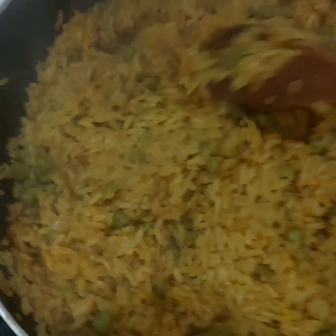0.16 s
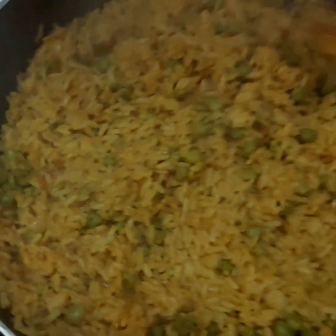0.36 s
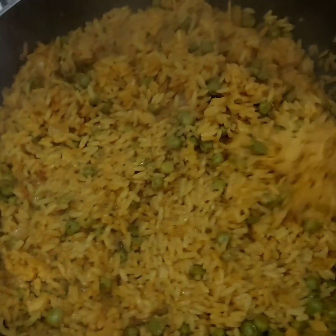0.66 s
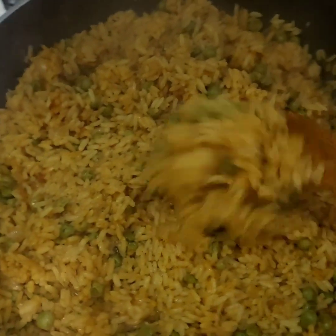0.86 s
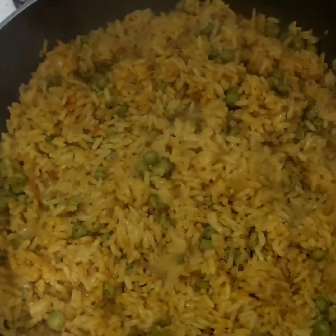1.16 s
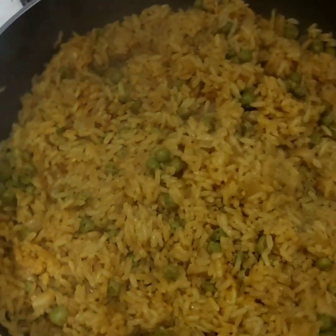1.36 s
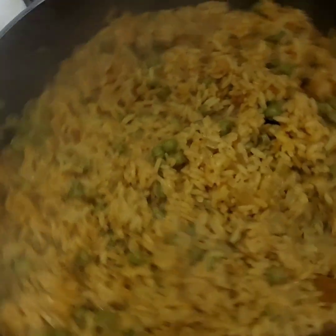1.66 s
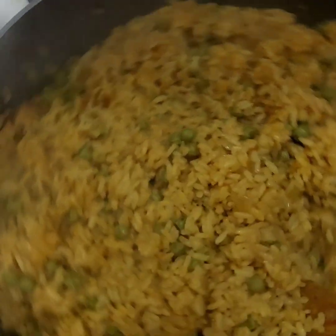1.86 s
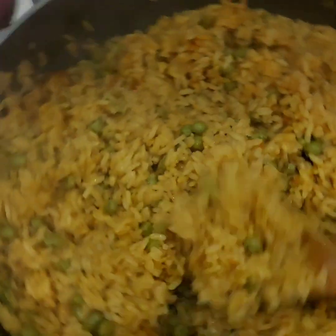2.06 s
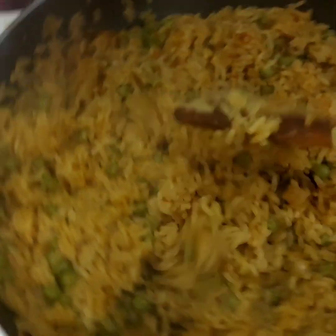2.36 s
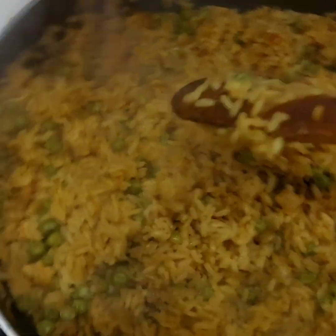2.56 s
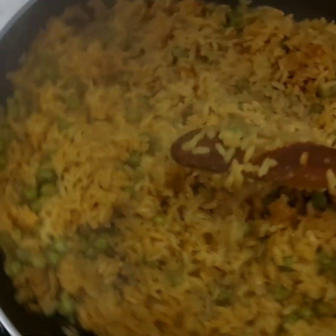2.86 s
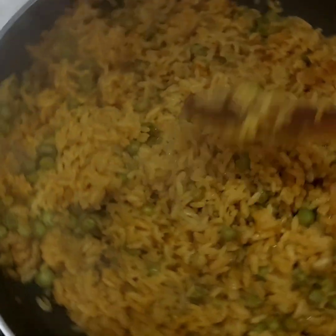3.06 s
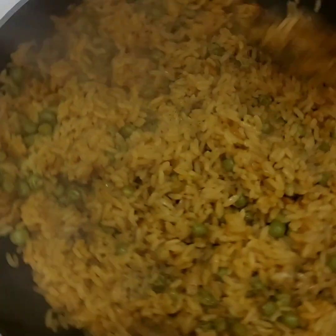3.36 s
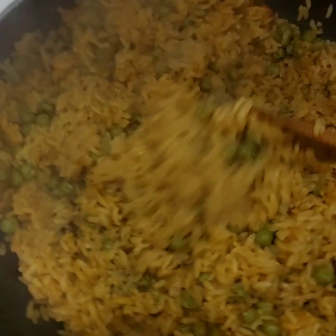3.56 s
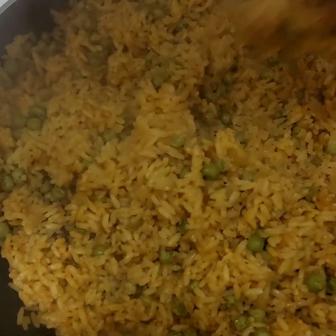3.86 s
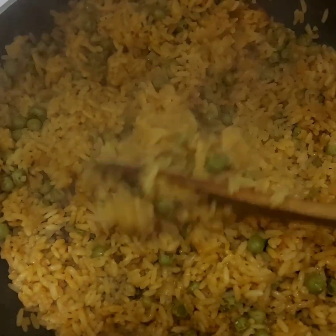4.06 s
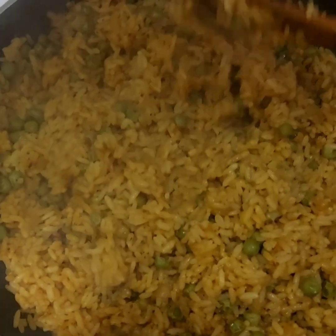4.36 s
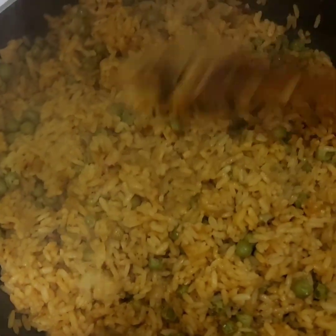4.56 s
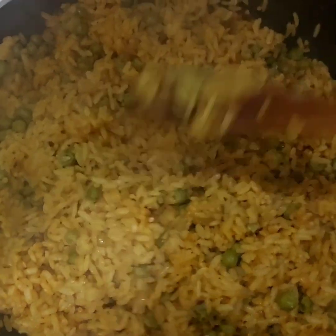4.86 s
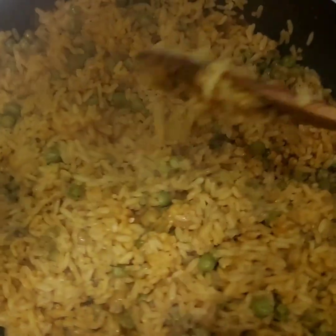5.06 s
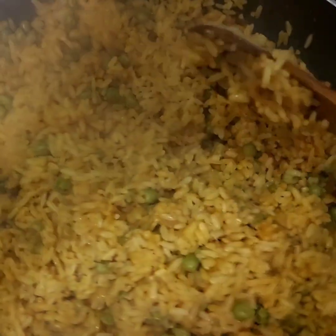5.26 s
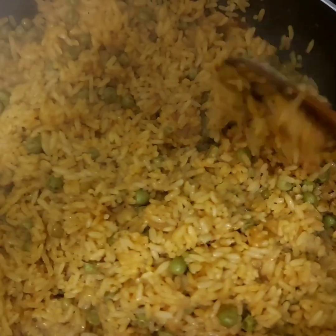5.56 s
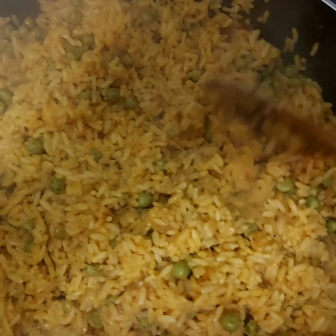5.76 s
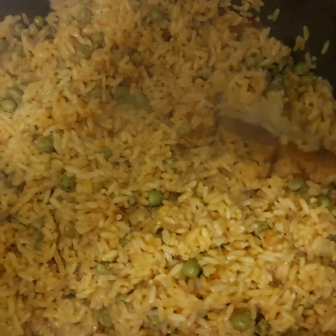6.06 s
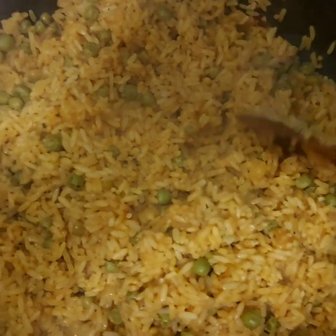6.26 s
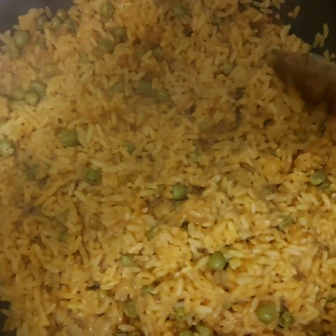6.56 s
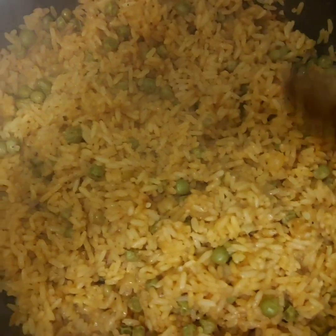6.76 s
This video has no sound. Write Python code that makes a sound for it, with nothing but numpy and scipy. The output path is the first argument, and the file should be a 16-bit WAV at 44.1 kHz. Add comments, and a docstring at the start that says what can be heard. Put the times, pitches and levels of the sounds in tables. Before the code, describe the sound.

A wooden spatula digs and scrapes through cooked rice in a pan with soft bumps, then raps the rim nine times, loud and steady.

```python
"""Turning rice in a pan

A wooden spatula digs through cooked rice, bumps the pan and drags over its bottom, then raps the rim nine times.
Knocks are damped modes of wood and pan plus a noise crack; drags, sweeps and rubs are trains of tiny slips.
Lumps of rice thud back into the pan, and the small kitchen answers with dense echoes.
Behind it, filtered noise and random bursts make a faint sizzle, frying, steam and a low stove murmur."""
import sys
import numpy as np
from scipy import signal
from scipy.fft import rfft, irfft, next_fast_len
from scipy.io import wavfile

SR = 44100
rng = np.random.default_rng(int(sys.argv[2]) if len(sys.argv) > 2 else 0)


def to_wav(s):
    """Save 16-bit WAV."""
    ch = np.atleast_2d(s).T  # columns
    pcm = np.round(np.clip(ch, -1, 1) * 32767)  # PCM
    wavfile.write(sys.argv[1], SR, pcm.astype(np.int16))


N = 304731
RING = 32768  # length of one event and its ring [samples]
RICE_T60_S = 0.65  # rice lying on the bottom damps every mode to under this time
BOTTOM_WEIGHT_HZ = 334  # on the bottom, the weight of the arm tells below this pitch

# spatula raps on the rim: (time [s], pitch favoured by the contact point [Hz], its lift [dB],
# level before layer gain [dB], weight behind it [dB], cut-off of the contact [Hz])
RAPS = [(5.4474, 2050, 15, -23, -7, 5700), (5.622, 1820, 10.5, -23, -1, 5230),
        (5.8002, 1850, 7.5, -22.5, -1.5, 4630), (5.972, 1500, -4.5, -22, -1.5, 3000),
        (6.1349, 1130, 5, -25, 4, 4770), (6.3232, 1450, 0, -21, -3.5, 5230),
        (6.5041, 1490, 0, -23.5, 0.5, 3650), (6.6732, 1500, 4.5, -21.5, -1, 6470),
        (6.8475, 1450, 2, -20, -4.5, 6400)]
# strokes of the blade over the bottom: (start [s], length [s], level before layer gain [dB],
# pitch favoured by the contact point [Hz])
STROKES = [(0.375, 0.028, -49.5, 1200), (0.94, 0.058, -42, 2240), (1.74, 0.028, -35, 1290),
           (1.861, 0.2, -52, 1960), (2.146, 0.014, -38, 1130), (2.501, 0.023, -45.5, 1080),
           (2.769, 0.025, -50, 1500), (2.85, 0.0077, -54, 1610), (3.144, 0.014, -45, 2300),
           (3.303, 0.03, -50.5, 1700), (3.544, 0.041, -50, 950)]
# the pan on its support: (pitch [Hz], bare t60 [s], level struck on the rim [dB],
# level struck on the bottom [dB])
PAN = [(79.15, 1, -25, -24.5), (114.5, 0.13, -15.5, -48), (137, 0.38, -61, -19), (190.7, 0.28, -27, -40),
       (236.3, 0.37, -36, -27.5), (287.4, 0.38, -31.5, -29), (315.2, 0.53, -56, -20.5),
       (328, 0.3, -25.5, -22.5), (380, 0.4, -64, -27), (401, 0.56, -43.5, -30.5), (439.6, 0.22, -30, -24.5),
       (461, 0.025, -50, -19), (510.5, 0.45, -34.5, -32.5), (610.7, 0.092, -17, -19.5),
       (763, 0.27, -38, -34), (1042, 0.31, -42, -39.5), (1246, 0.19, -50, -82), (1394, 0.11, -32, -67),
       (1796, 0.24, -55, -72), (1791, 0.4, -44, -50), (1980, 0.18, -37, -38), (2076, 0.17, -56, -75),
       (2470, 0.75, -43, -54), (2946, 0.16, -34.5, -46)]
# thud, body, knock, click and tick: (lower edge [Hz], upper edge [Hz])
BANDS = [(60, 160), (200, 700), (900, 2600), (3000, 8000), (9000, 15000)]
# balance of a bare, hard contact on the bottom or wall: (one level per band of BANDS [dB])
DIG_BALANCE = [-4, -1.5, 0, -4, -22.5]
# colour of a pop: (frequency [Hz], relative level [dB])
POP = [(1000, 0), (4000, -14), (8000, -13), (12000, -11), (16000, -11)]
# colour of the sizzle: (frequency [Hz], relative level [dB])
SIZZLE = [(300, -11), (1000, -1), (1700, 4.5), (2300, 3), (3000, -2), (5000, -4.5), (8000, -1),
          (9600, -2.5), (11500, 0.5), (14000, 0), (16000, -14)]


def digs(echoes, gain_db=0.0, lift_db=6):
    """The blade is pushed through the rice until it meets the pan."""
    # the more rice lies between blade and pan, the lower the cut-off:
    # (time [s], pitch favoured by the contact point [Hz], level before layer gain [dB],
    # weight behind it [dB], cut-off of the contact [Hz])
    bumps = [(0.2944, 596, -42, -11.5, 650), (0.5441, 580, -49, -7, 590), (1.0198, 970, -45, 1, 3720),
             (1.7382, 3800, -41, -0.5, 5700), (1.811, 1190, -59.5, 13.5, 2000),
             (1.874, 950, -36.5, -24, 2800), (1.956, 1830, -41, -5.5, 1920), (2.1477, 1080, -41, 6.5, 3700),
             (2.5044, 1090, -47.5, 2, 2300), (2.548, 1120, -56.5, 11, 2210), (3.137, 2300, -50, -25, 2150),
             (3.307, 1400, -58, -11, 3400), (3.352, 1610, -60, -10, 3400), (3.543, 1120, -59.5, 15, 2200),
             (3.6904, 1140, -65.5, 9, 1800), (3.746, 1120, -71, 19, 2380)]
    out = np.zeros((2, N))
    for s, hz, db, weight_db, cutoff_hz in bumps:
        hit = favour(bottom_blow(echoes), hz, lift_db)
        add(out, s, force(hit, contact(DIG_BALANCE, db, weight_db, BOTTOM_WEIGHT_HZ, cutoff_hz)))
    return undb(gain_db) * out


def raps(echoes, gain_db=-0.1):
    """The shaft is knocked on the bare rim, each time at another point along its length."""
    # hand-damped bending modes, struck across the shaft: (pitch [Hz], t60 [s], level [dB])
    shaft = [(317, 0.025, -3), (626, 0.038, -4), (1160, 0.013, -15.5), (1633, 0.0079, -3.5),
             (1980, 0.034, -21.5)]
    # how the rim radiates: (frequency [Hz], level [dB])
    rim = [(80, -4.5), (125, 4), (165, -4), (200, -6), (275, 1.5), (320, -1), (490, 2.5), (550, -5.5),
           (640, -2.5), (730, -2.5), (850, -4.5), (950, -3), (1060, 1.5), (1230, 9.5), (1320, 2), (1410, 4),
           (2050, -1), (2350, -2.5), (2500, -6.5), (2950, -4.5)]
    # balance of a bare, hard rap: (one level per band of BANDS [dB])
    rap_balance = [-7, -0.05, 0, -14.5, -17.5]
    weight_hz = 650  # on the rim, the weight of the arm tells below this pitch
    bare_pan = [(hz, t60, rim_db) for hz, t60, rim_db, _ in PAN]
    out = np.zeros((2, N))
    for s, hz, lift_db, db, weight_db, cutoff_hz in RAPS:
        hit = blow(shaft, bare_pan, echoes, crack_db=-18.5, crack_s=0.0033, pan_db=1.5, room_db=-23.5,
                   left_db=2.0, lag_s=0.00014, wood_cycles=0.27, pan_cycles=1.0, detune=0.019,
                   uneven_db=4.0, moved=0.14)
        hit = favour(colour(hit, rim), hz, lift_db)
        add(out, s, force(hit, contact(rap_balance, db, weight_db, weight_hz, cutoff_hz)))
    return undb(gain_db) * out


def ticks(echoes, gain_db=-3.0):
    """The thin edge of the blade glances off the wall while stirring, and catches it between raps."""
    # clicks: (time [s], level before layer gain [dB], weight behind it [dB], cut-off of the contact [Hz])
    clicks = [(0.3721, -40.5, 0.5, 2300), (0.937, -40, -9, 5030), (2.774, -51.5, -4, 3200),
              (2.793, -53, -6, 3500), (2.85, -58, -6, 3800), (3.184, -52, -20, 3700),
              (3.1983, -49.5, -20, 3700), (3.6386, -64, -5, 4580), (5.583, -49.5, 13, 2200),
              (5.7276, -35, -10, 3980), (5.93, -53, -13, 3350), (6.4405, -30, -13, 6700),
              (6.482, -41, 3, 2800), (6.636, -45, -21, 2010), (6.7814, -31.5, -14, 6550)]
    # resonances that the edge brings out, brightest near 3.5 kHz: (frequency [Hz], level [dB])
    edge = [(300, 0), (620, -9), (1080, 6), (1400, 3), (1750, -7), (2300, -1), (2800, -1), (3500, 7),
            (4200, 0), (5000, -6), (6000, 1), (9000, -3)]
    out = np.zeros((2, N))
    for s, db, weight_db, cutoff_hz in clicks:
        hit = colour(bottom_blow(echoes), edge)
        add(out, s, force(hit, contact(DIG_BALANCE, db, weight_db, BOTTOM_WEIGHT_HZ, cutoff_hz)))
    return undb(gain_db) * out


def bottom_blow(echoes):
    """The blade tip strikes the rice-covered bottom, which radiates through the rice."""
    # the spatula's wood, struck on the tip of the blade: (pitch [Hz], t60 [s], level [dB])
    blade = [(577, 0.061, -50), (1200, 0.015, -4.5), (1500, 0.051, -19.5), (2300, 0.035, -13),
             (3190, 0.0061, -8.5), (3700, 0.013, -13), (6320, 0.015, -25.5), (7200, 0.012, -23)]
    # how the bottom radiates through the rice: (frequency [Hz], level [dB])
    bottom = [(140, -1), (185, -3), (240, 5.5), (400, -3), (500, -7.5), (700, -5), (1100, 1), (1900, 0),
              (2700, -3), (3400, 0.5), (5100, -1), (7800, -0.5), (9400, -10), (12000, -16)]
    hit = blow(blade, covered_pan(RICE_T60_S), echoes, crack_db=-13.5, crack_s=0.0025, pan_db=7.0,
               room_db=-16.5, left_db=0.0, lag_s=0.00002, wood_cycles=1.0, pan_cycles=4.1, detune=0.056,
               uneven_db=4.0)
    return colour(hit, bottom)


def blow(wood, pan, echoes, crack_db, crack_s, pan_db, room_db, left_db, lag_s,
         wood_cycles, pan_cycles, detune, uneven_db, moved=0.093):
    """One contact: the wood clacks, its surface cracks, the pan takes up the ring and the kitchen answers."""
    t = np.arange(RING) / SR
    clack = -ring(wood, detune, wood_cycles)
    # the right port hears it first
    late_clack = np.interp(t - lag_s, t, clack, left=0)
    clack = np.array([undb(left_db) * late_clack, clack])

    crack_colour = [(500, 22.5), (3000, 11.0), (7500, -3.0), (9600, -9.0), (11500, -12.5), (16000, -21.5)]
    crack = colour(diffuse(RING), crack_colour) * np.exp(-t / crack_s)

    # each contact point favours other modes of the pan
    uneven_pan = [(hz, t60, db + uneven_db * rng.standard_normal()) for hz, t60, db in pan]
    metal = ring(uneven_pan, 0.0044, pan_cycles)

    moved = np.clip(moved, 0, 1)  # share of the echo pattern that changes with the contact point
    room = kitchen(np.sqrt(1 - moved) * echoes + np.sqrt(moved) * diffuse(RING))
    return clack + undb(crack_db) * crack + undb(pan_db) * metal + undb(room_db) * room


def ring(modes, detune, swell_cycles):
    """Damped sines, slightly retuned by each contact point; low modes take longest to build up."""
    t = np.arange(RING, dtype=np.float32) / SR
    hz, t60, db = np.transpose(modes).astype(np.float32)[:, :, None]
    hz = hz * (1 + detune * rng.standard_normal(hz.shape)).astype(np.float32)
    build = 1 - np.exp(-np.minimum(t * hz / float(swell_cycles), 20))
    fade = np.exp(-np.minimum(float(np.log(1000)) * t / t60, 20))
    return undb(db[:, 0]) @ (build * fade * np.sin(2 * np.pi * hz * t))


def covered_pan(longest_s):
    """Modes of the pan struck on the bottom, damped by the rice on it."""
    return [(hz, 1 / (1 / t60 + 1 / longest_s), db) for hz, t60, _, db in PAN]


def contact(balance, db, weight_db, weight_hz, cutoff_hz):
    """Starting level of each band: weight adds bass, a cushioned contact loses treble."""
    hz = np.sqrt(np.prod(BANDS, axis=1))
    cushion = -10 * np.log10(1 + (hz / cutoff_hz) ** 4)
    weight = weight_db / (1 + (hz / weight_hz) ** 2)
    # the cushion leaves the knock, band 2, as it is
    return db + np.array(balance) + weight + cushion - cushion[2]


def force(x, levels_db):
    """Strength and hardness of a contact set how loud each band starts."""
    size = SR // 20  # the first 50 ms
    window = signal.get_window("hann", 2 * size)[size:] ** 0.25
    hz = freqs(RING)
    for _ in range(2):  # a second pass comes closer to the wanted levels
        energy = np.abs(rfft(x[:, :size] * window, RING)) ** 2
        power = np.mean(energy, axis=0) * 2 / (size * RING)
        now = [10 * np.log10(power[(hz > lo) & (hz < hi)].sum()) for lo, hi in BANDS]
        x = colour(x, [(np.sqrt(lo * hi), want - has)
                       for (lo, hi), want, has in zip(BANDS, levels_db, now)])
    return x


def favour(x, hz, lift_db, width=1.44):
    """The point of contact brings out the modes around one pitch."""
    return colour(x, [(hz / width, 0), (hz, lift_db), (hz * width, 0)])


def drag(echoes, gain_db=1.0, shifts_per_s=22, count=5):
    """The blade sticks and slips over grains: each slip is a tiny blow at a contact point that keeps shifting."""
    # colour of a slip of the blade: (frequency [Hz], level [dB])
    slip_colour = [(80, -2.5), (300, -3.5), (800, 0.5), (1200, -7), (3000, -6), (5000, -5), (7500, -4),
                   (11000, 15)]
    t = np.arange(N) / SR
    pushes = undb(gain_db) * rubbing()
    place = rng.integers(count, size=N)[(t * shifts_per_s).astype(int)]
    out = 0
    for k in range(count):
        body = colour(bottom_blow(echoes), slip_colour)
        body = body / np.sqrt(np.mean(body ** 2) * RING)  # unit energy
        out = out + signal.oaconvolve(pushes * (place == k), body, axes=1)[:, :N]
    return out


def rubbing(lift_db=5):
    """Grains rub on the pan: pushed by each stroke, crumbling after it, jolted by each rap."""
    release_s = 0.03  # time constant of lifting off
    crumble_db, crumble_s = -21, 0.24  # loosened rice trickles on: level against the stroke, time constant
    rattle_db, jolt_s, rattle_s = -28.5, 0.022, 0.13  # level against the rap, jolt length, time constant
    out = np.zeros((1, N))
    for s, length_s, db, hz in STROKES:
        pressure = swell(length_s, release_s) + undb(crumble_db) * swell(length_s, crumble_s)
        add(out, s, favour(undb(db) * pressure * slips(), hz, lift_db)[None])
    for s, _, _, db, _, _ in RAPS:
        add(out, s, (undb(db + rattle_db) * swell(jolt_s, rattle_s) * slips())[None])
    return out


def swell(length_s, release_s, rise=0.1):
    """Pressure of one push: it builds over the share rise of its length, holds and dies away."""
    t = np.arange(RING) / SR
    return np.clip(t / (rise * length_s), 0, 1) * np.exp(-np.clip((t - length_s) / release_s, 0, 20))


def slips(slips_per_s=560, spread_db=5, clump_db=4.0, clumps_per_s=55):
    """Stick and slip: tiny pushes of uneven size at random moments, bunched by clumps of rice."""
    sizes = undb(spread_db * rng.uniform(-2.1, 2.0, RING)) * rng.choice([-1, 1], RING)
    knots = rng.uniform(-2.3, 2.4, RING)
    clumps = np.interp(np.arange(RING) / SR * clumps_per_s, np.arange(RING), knots)
    moments = rng.random(RING) < slips_per_s / SR
    return level(moments * sizes * undb(clump_db * clumps), 0)


def sweeps(echoes, pan_db=-8):
    """The flat blade in loose rice: dense light slips swish with its speed, and the pan sings faintly."""
    # sweeps: (time of the fastest moment [s], half length [s], level [dB])
    passes = [(1.491, 0.039, -52), (1.58, 0.059, -49.5), (1.687, 0.021, -49.5), (3.206, 0.022, -51.5),
              (3.352, 0.039, -56)]
    # colour of grains brushing past each other: (frequency [Hz], level [dB])
    swish = [(150, -5), (400, -2), (700, -2), (1300, 7.5), (2200, -5), (3500, 1.5), (5500, 2.5), (8000, 10),
             (12000, 6)]
    t = np.arange(RING) / SR
    out = np.zeros((1, N))
    for s, half_s, db in passes:
        speed = np.exp(-(t / half_s - 2) ** 2)
        grains = slips(slips_per_s=1500, spread_db=4.5, clump_db=3.0, clumps_per_s=49)
        add(out, s - 2 * half_s, (undb(db) * speed * grains)[None])
    pan = colour(ring(covered_pan(RICE_T60_S), 0.0037, 0.44), [(400, -6.5), (1000, -1.5)])
    body = colour(level(kitchen(echoes), 0) + level(pan, pan_db), swish)
    return signal.oaconvolve(out, body / np.sqrt(np.mean(body ** 2) * RING), axes=1)[:, :N]


def rubs(echoes, width_hz=70, room_db=-3):
    """Quick slips keep a narrow resonance of the blade edge going; it sinks as the contact slides along."""
    # rubs: (start [s], length [s], level before the fade in and out [dB], first pitch [Hz], last pitch [Hz])
    slides = [(1.646, 0.18, -59, 1610, 1500), (1.769, 0.11, -69, 1500, 1030),
              (1.885, 0.21, -75, 1980, 1810)]
    out = np.zeros((2, N))
    room = kitchen(echoes)
    for s, length_s, db, first_hz, last_hz in slides:
        progress = np.minimum(np.arange(RING) / SR / length_s, 1)
        grain = signal.lfilter([1], [1, -np.exp(-np.pi * width_hz / SR)], slips())
        turns = np.cumsum(first_hz + (last_hz - first_hz) * progress) / SR
        tone = level(grain * np.sin(2 * np.pi * turns), db)
        add(out, s, (tone * np.sin(np.pi * progress))[None])
    answer = signal.oaconvolve(out, room / np.sqrt(np.sum(room[0] ** 2)), axes=1)[:, :N]
    return out + undb(room_db) * answer


def lumps(gain_db=-1, lift_db=16, longest_s=0.53):
    """A soft lump lands as many dull pushes; its size and landing place decide which low mode answers."""
    # lumps flop back into the pan: (time [s], level before layer gain [dB], pitch of the thud [Hz],
    # time the fall takes to build [s])
    falls = [(0.297, -31.5, 318, 0.0097), (0.555, -44, 320, 0.011), (0.584, -62, 101, 0.01),
             (0.656, -44.5, 314, 0.008), (0.964, -42.5, 290, 0.016), (0.981, -37, 124, 0.0027),
             (1.747, -43.5, 149, 0.0073), (1.913, -45.5, 51.6, 0.027), (2.219, -40.5, 79.6, 0.019),
             (2.525, -47, 140, 0.009), (2.79, -52.5, 93, 0.049), (3.271, -46.5, 60.6, 0.05),
             (3.554, -46.5, 313, 0.0077), (3.62, -48, 78.5, 0.022), (4.471, -72, 380, 0.022)]
    t = np.arange(RING) / SR
    out = np.zeros((2, N))
    for s, db, hz, fall_s in falls:
        pushes = diffuse(RING) * t * np.exp(-t / fall_s)
        pan = ring(covered_pan(longest_s), 0.0052, 0.024)
        thud = signal.fftconvolve(pushes, pan[None], axes=1)[:, :RING]
        dull = signal.butter(3, 2.14 * hz, fs=SR, output="sos")
        thud = favour(signal.sosfilt(dull, thud), hz, lift_db)
        start_rms = np.sqrt(np.mean(thud[:, :SR // 10] ** 2))
        add(out, s, thud * undb(db + gain_db) / start_rms)
    return out


def kitchen(noise, early_db=8, early_s=0.0053, onset_s=0.0029):
    """Dense echoes: first from the pan wall and hob, then from the room, each band with its own decay."""
    # the kitchen's answer to a knock: (frequency [Hz], relative level per Hz [dB], t60 [s])
    answer = [(46, 4, 0.95), (121, 10.5, 1), (213, -9, 1), (372, 1.5, 0.96), (603, 8, 0.42),
              (1034, -4.5, 0.47), (1190, -3, 0.39), (2420, 1.5, 0.34), (3400, -11, 0.36),
              (4230, -11.5, 0.36), (8340, -23.5, 0.34), (9800, -40.5, 0.67), (11300, -24, 0.29),
              (15700, -46, 0.29)]
    t, hz = np.arange(RING) / SR, freqs(RING)
    spectrum = rfft(level(colour(noise, [row[:2] for row in answer]), 0))
    centres = np.log([row[0] for row in answer])
    tail = 0
    for share, row in zip(np.eye(len(answer)), answer):
        band = irfft(spectrum * np.interp(np.log(hz + 1), centres, share))
        tail = tail + band * np.exp(-np.log(1000) * t / row[2])
    onset = 1 - np.exp(-(t / onset_s) ** 2)
    return tail * onset * (1 + undb(early_db) * np.exp(-t / early_s))


def sizzle(hiss_db=-69.0, crackle_db=-80, pops_per_s=70, pop_db=1):
    """Steam hisses under the rice; small bubbles burst all the time, a few of them loudly."""
    # wet grains popping on the hot metal: (time [s], peak level before pop_db and POP colour [dB])
    loud_pops = [(.7073, -39), (1.2511, -47), (1.4545, -22), (3.4261, -47), (3.4391, -33), (3.5102, -30.5),
                 (3.813, -44)]
    bursts = (rng.random(N) < pops_per_s / SR) * rng.exponential(size=N)
    crackle = level(bursts * rng.uniform(0.27, 1, (2, N)), crackle_db)
    t = np.arange(SR // 100) / SR
    for s, db in loud_pops:
        burst = rng.standard_normal((2, len(t))) * np.exp(-t / 0.0005)
        add(crackle, s, burst * undb(db + pop_db) / np.abs(burst).max())
    hiss = level(colour(diffuse(N), SIZZLE), hiss_db) * waver(depth_db=0.8, per_s=3)
    return hiss + colour(crackle, POP)


def frying(bursts_per_s=1500):
    """Wet rice landing on bare metal spits in a fine, dense crackle that swells and dies down."""
    # handfuls of rice fry: (time of the loudest moment [s], half length [s], level [dB])
    flares = [(0.722, 0.065, -62), (1.595, 0.75, -62), (3.512, 0.28, -63)]
    t = np.arange(N) / SR
    heat = sum(undb(db) * np.exp(-((t - s) / half_s) ** 2) for s, half_s, db in flares)
    bursts = (rng.random((2, N)) < bursts_per_s / SR) * rng.standard_normal((2, N))
    return heat * level(colour(bursts, POP), 0)


def steam(steam_db=-76, lowest_hz=6000, flare_s=0.2):
    """Rice turned onto the hot metal hisses for a moment, the more the longer the stroke."""
    t = np.arange(N) / SR
    turned = sum(length_s * np.exp(-((t - s - length_s) / flare_s) ** 2) for s, length_s, _, _ in STROKES)
    highpass = signal.butter(2, lowest_hz, "high", fs=SR, output="sos")
    hiss = signal.sosfilt(highpass, colour(diffuse(N), SIZZLE))
    return level(hiss, steam_db) * np.sqrt(turned / turned.max())


def stove(murmur_db=-60):
    """A low, wavering murmur of filtered noise under everything."""
    # colour of the murmur: (frequency [Hz], relative level [dB])
    murmur = [(15, -24), (28, -11), (45, 1.5), (62, 3), (110, -1), (175, -16.5), (300, -16), (450, -19),
              (700, -27), (2000, -35), (5000, -77)]
    return level(colour(diffuse(N), murmur), murmur_db) * waver(depth_db=3, per_s=6)


def waver(depth_db, per_s):
    """A gain that wanders by about depth_db either way, with per_s turning points a second."""
    t = np.arange(N) / SR
    knots = np.arange(0, t[-1] + 1, 1 / per_s)
    return undb(depth_db * np.interp(t, knots, rng.uniform(-1.1, 1, len(knots))))


def diffuse(size, spacing=0.13):
    """Noise from all sides on two ports, spacing [m] apart: alike in the bass, unrelated in the treble."""
    mid, side = rfft(rng.standard_normal((2, size)))
    alike = np.sinc(2 * freqs(size) * spacing / 343)  # 343 m/s: speed of sound
    mid, side = mid * np.sqrt((1 + alike) / 2), side * np.sqrt((1 - alike) / 2)
    return irfft(np.array([mid + side, mid - side]), size)


def colour(x, points):
    """Causal, minimum-phase filter through (frequency [Hz], level [dB]) points."""
    size = 2 * next_fast_len(x.shape[-1] // 2 + 2048)
    cepstrum = irfft(np.log(undb(along(points, freqs(size)))))
    # folding the cepstrum makes the filter causal
    cepstrum[1:size // 2] *= 2
    cepstrum[size // 2 + 1:] = 0
    return irfft(rfft(x, size) * np.exp(rfft(cepstrum)))[..., :x.shape[-1]]


def along(points, hz, axis=1):
    """Read a column of a table on a log-frequency axis."""
    table = np.array(points, float)
    return np.interp(np.log(np.maximum(hz, 1)), np.log(table[:, 0]), table[:, axis])


def freqs(size):
    """Frequencies of a spectrum's bins."""
    return np.fft.rfftfreq(size, 1 / SR)


def undb(db):
    """Decibels to gain."""
    return 10 ** (np.asarray(db) / 20)


def level(x, db):
    """Scale to an rms level."""
    return x * undb(db) / np.sqrt(np.mean(x ** 2))


def add(out, s, x):
    """Mix a sound in at time s."""
    start = int(s * SR)
    out[:, start:start + x.shape[1]] += x[:, :N - start]


def scene():
    """All spatula contacts share one kitchen; the rice and the stove go on around them."""
    echoes = diffuse(RING)
    spatula = digs(echoes) + ticks(echoes) + raps(echoes) + drag(echoes) + sweeps(echoes) + rubs(echoes)
    return spatula + lumps() + sizzle() + frying() + steam() + stove()


def record(dry, ceiling=7.7, low_hz=32, top_hz=15900):
    """Each microphone port has its colour; deep bass is cut, peaks are softly rounded and the top is cut."""
    # left port minus right: (frequency [Hz], level difference [dB])
    port_tilt = [(30, -11), (70, -6.5), (130, -4), (280, -1.5), (620, 0), (1100, 0), (1700, 5.5), (3100, 7),
                 (4300, -4.5), (7800, -4.5), (11000, 1)]
    ports = np.array([colour(x, [(hz, side * db / 2) for hz, db in port_tilt])
                      for x, side in zip(dry, (1, -1))])
    ports = signal.sosfilt(signal.butter(4, low_hz, "high", fs=SR, output="sos"), ports)
    rounded = ceiling * np.tanh(ports / ceiling)
    return signal.sosfilt(signal.ellip(8, 0.2, 80, top_hz, fs=SR, output="sos"), rounded)


dry = scene()
out = record(dry)
to_wav(out)
```